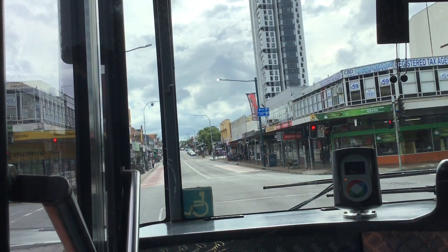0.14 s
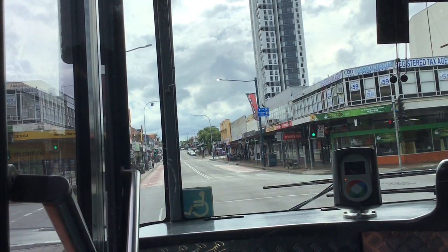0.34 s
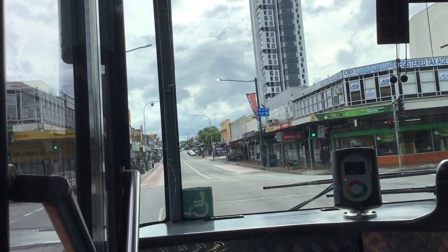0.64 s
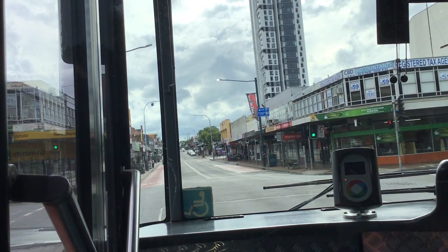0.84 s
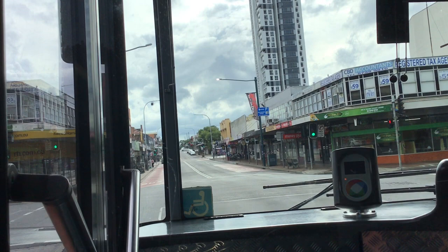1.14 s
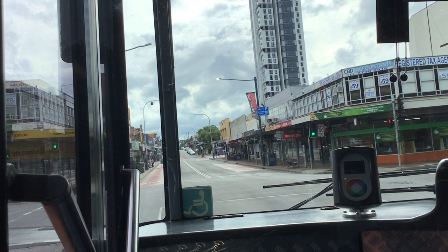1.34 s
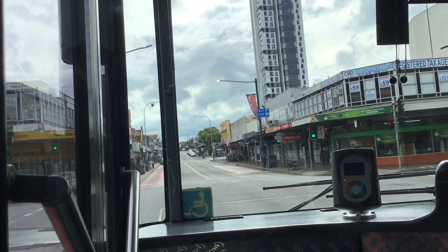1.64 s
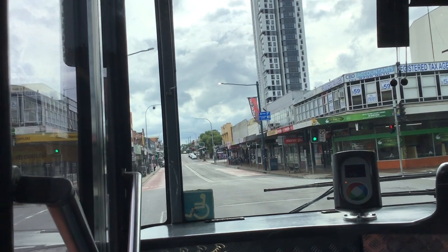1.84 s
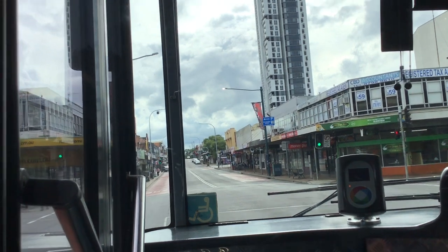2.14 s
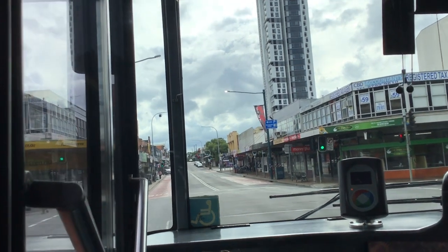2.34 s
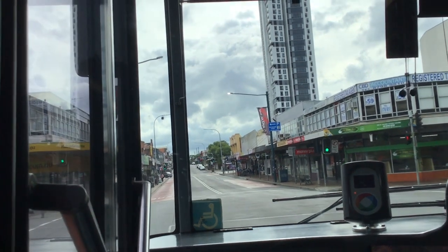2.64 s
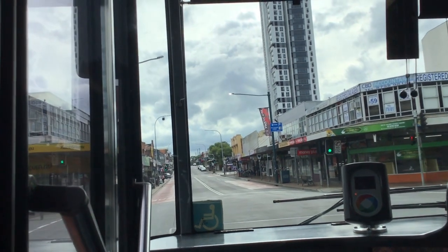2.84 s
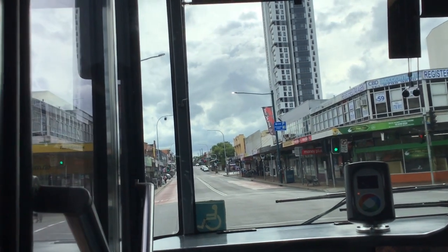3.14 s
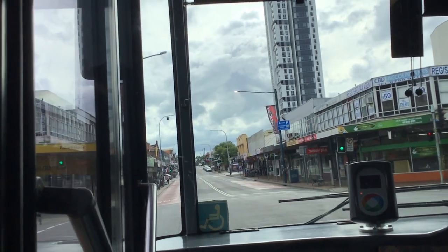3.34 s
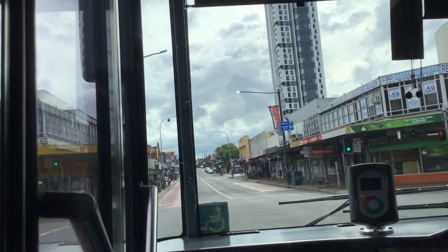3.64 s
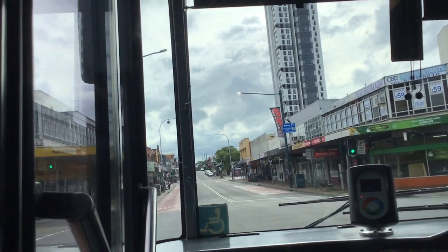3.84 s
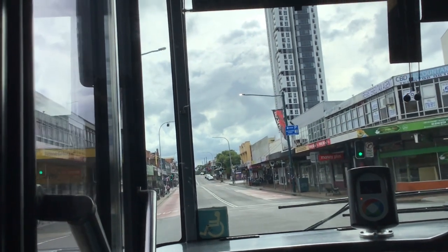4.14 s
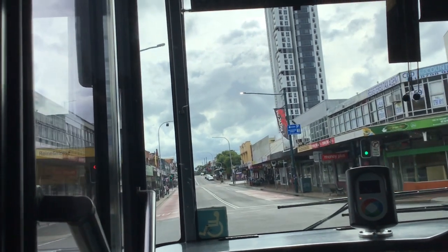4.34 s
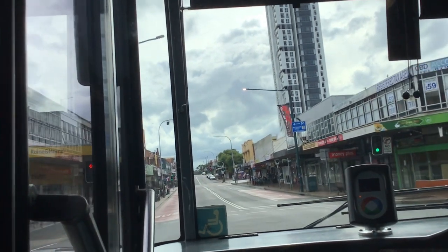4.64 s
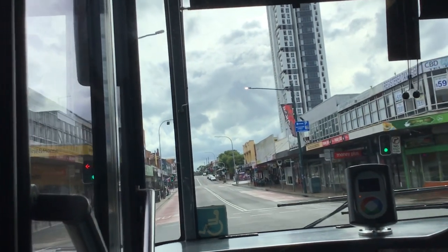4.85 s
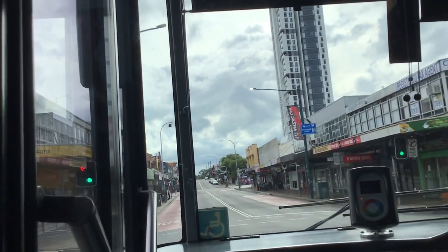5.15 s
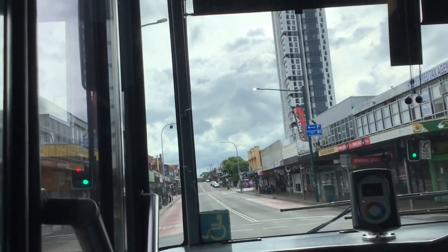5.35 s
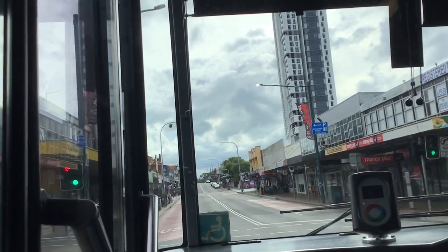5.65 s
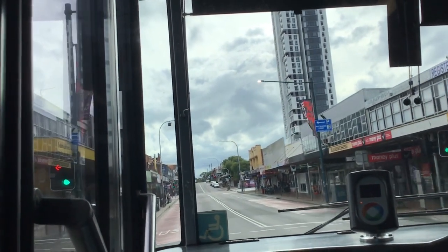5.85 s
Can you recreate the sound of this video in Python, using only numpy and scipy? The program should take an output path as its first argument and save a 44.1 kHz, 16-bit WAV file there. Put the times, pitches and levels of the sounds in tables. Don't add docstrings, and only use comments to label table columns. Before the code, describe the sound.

Inside a bus at a junction, a diesel engine idles low with soft clatter and a steady fan hum. Around one second the brake releases with a short puff of air and a metallic clack. The driveline shudders, then the engine pulls and climbs, booming deeply. Loose trim knocks sharply just after three seconds, with faint rustles nearby. Heard in mono from a microphone in the cabin.

```python
import sys
import numpy as np
from scipy import signal
from scipy.fft import rfft, irfft, next_fast_len
from scipy.io import wavfile
from scipy.ndimage import uniform_filter1d, map_coordinates

SR = 44100
rng = np.random.default_rng(int(sys.argv[2]) if len(sys.argv) > 2 else 0)


def ratio(d):
    e = np.asarray(d, float) / 20
    return 10 ** e


def master(y):
    cut = np.clip(np.atleast_2d(y).T, -1, 1)
    pcm = np.round(cut * 32767)
    wavfile.write(sys.argv[1], SR, pcm.astype(np.int16))


N = 264159

# (time [s], rate [Hz])
IDLE_SPEED = [(0.0, 30.34), (.3, 30.05), (.75, 30.15), (.92, 29.7), (1.36, 30.42)]
SHUDDER_SPEED = [(1.5, 33.23), (1.66, 34.46), (1.8, 35.5), (1.96, 33.24), (2.1, 35.4), (2.24, 33.8)]
PULL_SPEED = [(1.75, 20.08), (1.91, 22.37), (2.12, 24.32), (2.39, 26.88), (2.66, 28.35), (2.92, 29.61),
              (3.4, 31.37), (3.75, 32.14), (4.25, 32.73), (4.9, 33.54), (5.37, 34.36), (5.99, 35.76)]
# (order [multiple], level [dB])
IDLE_STRONG = [(2, -33), (3, -35.5), (6, -33.5)]
SHUDDER_STRONG = [(2, -36), (3, -39), (4, -40)]
PULL_STRONG = [(2, -20.5), (4, -20.5), (6, -26)]
# (frequency [Hz], level [dB])
IDLE_REACH = [(120, -3), (150, 1), (180, 0), (210, -14), (240, 0), (270, -18)]
SHUDDER_REACH = [(170, -6), (205, 3.5), (240, -8.5)]
PULL_REACH = [(85, 0.5), (100, 2), (140, 3.5), (175, 1.5), (200, -3), (230, -4.5), (265, -12.5), (300, -9),
              (345, -11.5), (385, -21.5), (460, -14.5), (540, -18), (600, -23), (850, -27)]
# (middle [s], length [s], order [multiple], gain [dB])
IDLE_SWELLS = [(.72, 0.19, 3, 12.5), (1.63, 0.99, 2, -14), (1.6, 0.71, 3, -10), (1.45, 0.79, 6, 4.5),
               (1.095, 0.21, 3, 6), (0.34, 0.23, 5, 5.5), (.68, 0.22, 5, 6), (0.95, .2, 6, -7),
               (1.1, 0.26, 4, 5.5), (1.83, .6, 8, -10), (1.09, .35, 5, -6), (1.3, .3, 2, -4),
               (0.49, .15, 4, 6)]
SHUDDER_JOLTS = [(1.685, 0.37, 2, 19), (1.65, 0.23, 3, 15.5), (1.658, 0.19, 4, 24), (1.635, 0.4, 6, 8),
                 (1.79, .1, 3, 18), (1.95, 0.18, 2, 12), (1.97, .25, 3, 10), (1.95, 0.18, 6, 6.5),
                 (2.1, 0.18, 4, 14.5), (1.55, .2, 7, 11)]
PULL_BOOMS = [(1.95, 0.23, 10, 12), (2.57, 0.28, 8, 12.5), (2.85, 0.25, 5, 2.5), (3.1, 0.27, 10, 6),
              (3.35, 0.68, 11, 4.5), (3.7, 0.26, 16, 9.5), (3.85, 1, 26, 10), (4.0, 0.37, 14, 0),
              (4.55, 0.4, 9, 7.5), (5.05, 0.57, 10, 4.5), (5.05, 0.94, 16, 2), (5.1, 0.56, 7, 5.5),
              (5.2, 0.48, 22, 12), (5.5, 1, 13, 5), (5.65, 0.76, 5, 6.5), (5.85, 0.57, 11, 16.5),
              (5.85, 0.57, 8, 7), (4.4, 0.45, 5, 2.5), (3.3, 0.32, 7, 5), (1.95, .45, 6, -7),
              (2.97, .45, 2, -5), (2.3, 0.25, 6, 3), (2.78, .12, 4, -8), (4.15, .2, 4, 6), (4.45, .3, 4, 4),
              (5.9, .5, 3, -4), (5.9, 0.36, 4, 2), (4.7, .2, 4, 3.5)]
# (centre [Hz], width [Hz], level [dB])
AIR_MODES = [(55.5, 5.2, -3.5), (64.08, 3.9, 1.5), (66.7, 3.63, 1.5), (69.35, 1.7, -1), (72.1, 3.43, -1),
             (93.2, 8.7, -2.5), (105.3, 5.8, 1), (111.9, 4.2, 0), (119, 4.7, 2), (125.64, 6.2, -0.5),
             (137.36, 5.64, 2), (185, 10.9, 2.5), (193.6, 5.6, -1.5), (212.3, 11.4, -3)]

# (frequency [Hz], level [dB per Hz])
RUMBLE_COLOUR = [(18, -39), (30, -31), (69, -1), (150, 2.5), (308, -9.5), (372, -21.5), (420, -37),
                 (550, -49), (920, -120)]
DRONE_COLOUR = [(190, -20), (330, 0.5), (415, -3), (522, -0.5), (758, -7), (794, -8.5), (987, -14.5),
                (1300, -42), (1690, -47), (2860, -120)]
CLATTER_IDLE_COLOUR = [(530, -17.5), (900, -15.5), (964, -7), (1390, -8.5), (1480, -12.5), (1870, -12),
                       (2770, -16.5), (3120, -16.5), (3400, -16.5), (3840, -20.5), (7000, -33.5),
                       (9100, -64), (15400, -120)]
CLATTER_LOAD_COLOUR = [(530, -31), (900, -2.5), (989, -0.5), (1340, -5.5), (1700, -5.5), (2030, -2),
                       (2840, -8.5), (3180, -10.5), (3290, -12), (3940, -12), (4600, -15), (5500, -13),
                       (7000, -32.5), (9100, -47), (15400, -120)]
PUFF_COLOUR = [(180, -28), (300, 1.5), (424, -7.5), (544, -0.5), (795, -14.5), (908, -11.5), (1700, -17.5),
               (1970, -12), (3130, -24), (4510, -19), (7160, -41), (8730, -41), (15600, -58)]
HISS_COLOUR = [(3410, -17.5), (5800, -7.5), (6980, -7), (10400, -10.5), (15600, -17.5)]
RUSTLE_COLOUR = [(5500, -30), (7000, -0.5), (9500, -2), (12000, -9), (14500, -5), (16000, -13)]
# (middle [s], length [s], gain [dB])
SMOOTH_ROAD = [(1.35, 0.23, -0.5), (2.08, .4, -1.5), (2.85, 0.47, -2), (3.47, 0.43, -7), (4.9, 0.31, -2)]

# (centre [Hz], width [Hz], level [dB])
BLOCK_MODES = [(1990, 210, 0), (2686, 75, -3), (3105, 47, -3.5), (3458, 48, -2.5), (4170, 84, -7.5),
               (5280, 90, -12), (5460, 60, -12), (10900, 960, -29.5)]
TRIM_MODES = [(1120, 310, -1), (1610, 450, 1.5)]
SNAP_MODES = [(2040, 860, -5), (3150, 510, 0)]
THUD_MODES = [(480, 113, -3), (677, 260, -7.5), (976, 230, -10.5)]

# (start [s], peak [dB], held [s], time to fade 60 dB [s], extra fizz [dB])
PUFFS = [(.659, -38, .015, .15, -15), (.996, -36.5, 0.016, 0.2, -20), (1.05, -21, 0.019, 0.35, -20),
         (1.942, -29.5, 0.014, 0.2, -15), (.93, -38, 0.054, 0.17, -22.5), (2.049, -41, .015, .12, -6),
         (3.169, -38, .005, 0.065, -5.5), (3.22, -26.5, 0.005, 0.12, -16),
         (3.225, -30, 0.0055, 0.055, -14.5), (1.054, -33, 0.007, 0.055, -7), (4.708, -29, 0.016, .1, -17.5)]
# (time [s], level [dB])
CLACKS = [
    (1.051, -28.5),
    (1.069, -32),
]
# (frequency [Hz], level [dB], time to fade 60 dB [s])
VALVE_TONES = [(1320, -6, 0.046), (2000, -18, .04), (4400, 2.5, 0.028), (5170, -5, .025)]
# (time [s], peak [dB], time to fade 60 dB [s], thud [dB])
KNOCKS = [(1.069, -22.5, 0.086, 2), (1.089, -32.5, 0.07, 4), (1.943, -27, 0.092, -3),
          (3.225, -15, 0.095, -5), (3.267, -29, 0.077, 0), (3.321, -22.5, 0.11, 2), (3.411, -23, 0.069, -3),
          (3.62, -35.5, 0.084, 6), (4.089, -28, 0.082, 1), (5.273, -36, 0.083, -3), (5.923, -29, 0.071, -4)]
# (middle [s], length [s], level [dB])
RUSTLES = [(1.565, .2, -65.5), (1.797, .08, -65), (2.937, 0.13, -58), (3.812, .16, -58.5), (4.13, .14, -64),
           (4.93, .07, -70)]
# (start [s], length [s], level [dB])
SQUEAKS = [
    (3.569, 0.05, -74),
    (4.172, 0.062, -64),
]
# (frequency [Hz], level [dB])
FAN_TONES = [(298, -39), (571, -53), (597, -50.5), (3451, -71.5), (7424, -80)]


def unit(x):
    return x / np.sqrt(np.mean(x ** 2) + 1e-20)


def along(points, hz):
    f, v = np.transpose(points)
    return np.interp(np.log(hz + 1), np.log(f + 1), v)


def speed(rows):
    s, hz = np.transpose(rows)
    return np.interp(np.arange(N) / SR, s, hz)


def wobble(rate):
    knots = rng.standard_normal(int(N * rate / SR) + 4)
    return map_coordinates(knots, [np.arange(N) * rate / SR])


def between(start, stop, ease):
    t = np.arange(N) / SR
    return np.clip(np.minimum(t - start, stop - t) / ease, 0, 1)


def swell(rows):
    return sum(db * between(s - length / 2, s + length / 2, length / 3) for s, length, db in rows)


def effort(idle_db, full_db):
    since = np.clip(np.arange(N) / SR - 1.417, 0, None)
    return full_db + (idle_db - full_db) * np.exp(-since / 0.23)


def filtered(x, response):
    m = next_fast_len(N + SR // 2)
    return irfft(rfft(x, m) * response(np.fft.rfftfreq(m, 1 / SR)), m)[..., :N]


def resonant(x, modes):
    def response(f):
        total = 0
        for k, (centre, width, db) in enumerate(modes):
            peak = 1j * f * width / (centre * centre - f * f + 1j * f * width)
            total = total + (-1) ** k * ratio(db) * peak
        return total

    power = np.mean(np.abs(response(np.linspace(1, SR / 2, num=4000))) ** 2)
    return filtered(x, response) / np.sqrt(power)


def rush(colour, patchy_db, gate=1):
    z = signal.stft(rng.standard_normal(N), nperseg=512)[2]
    field = uniform_filter1d(rng.standard_normal(z.shape), size=5, axis=0)
    field = uniform_filter1d(field, size=10, axis=1)
    patched = signal.istft(z * ratio(patchy_db * unit(field)), nperseg=512)[1][:N]
    return unit(filtered(patched * gate, lambda hz: ratio(along(colour, hz))))


def air_gain_db(hz, modes):
    power = sum(ratio(2 * db) / (1 + (2 * (hz - centre) / width) ** 2) ** 2 for centre, width, db in modes)
    return 10 * np.log10(power)


def orders(rows, strong, rest_db, reach, count, waver_db, drift, booms, modes=None):
    firing_hz = speed(rows)
    turn = 2 * np.pi * np.cumsum(firing_hz) / SR
    strong_db = {round(k): db for k, db in strong}
    total = np.zeros(N)
    for k in range(2, count):
        boom_db = swell([(s, length, db) for s, length, order, db in booms if round(order) == k])
        waver = waver_db * wobble(5)
        if k not in strong_db:
            level_db = boom_db + waver + rest_db + along(reach, k * firing_hz)
        elif modes:
            level_db = boom_db + 0.4 * waver + strong_db[k] + air_gain_db(k * firing_hz, modes)
        else:
            level_db = boom_db + waver + strong_db[k]
        phase = rng.uniform(0, 2 * np.pi) + drift * wobble(8)
        total += np.sqrt(2) * ratio(level_db) * np.sin(k * turn + phase)
    return total


def pulling():
    rest_db = -32.5 - 7 * between(1.85, 2.55, ease=0.17)
    lines = orders(PULL_SPEED, PULL_STRONG, rest_db, PULL_REACH, count=28, waver_db=2.2, drift=.1,
                   booms=PULL_BOOMS, modes=AIR_MODES)
    return between(1.76, 7, ease=0.17) * lines


def idling():
    lines = orders(IDLE_SPEED, IDLE_STRONG, -33, IDLE_REACH, count=10, waver_db=1.5, drift=.08,
                   booms=IDLE_SWELLS)
    return between(-1, 1.99, ease=0.18) * lines


def shudder():
    lines = orders(SHUDDER_SPEED, SHUDDER_STRONG, -38.5, SHUDDER_REACH, count=8, waver_db=1, drift=.15,
                   booms=SHUDDER_JOLTS)
    return between(1.5, 2.24, ease=0.055) * lines


def firing_throb():
    firing_hz = np.where(np.arange(N) < 2 * SR, speed(IDLE_SPEED), speed(PULL_SPEED))
    return 1 + 0.056 * np.cos(4 * np.pi * np.cumsum(firing_hz) / SR + 0.38 * wobble(28))


def clatter(throb):
    load = np.clip((np.arange(N) / SR - 1.44) / 0.031, 0, 1)
    surge_db = 1.9 * between(1.46, 1.5, ease=0.033)
    level_db = effort(-50.5, -42.5) + surge_db
    idle = rush(CLATTER_IDLE_COLOUR, patchy_db=1.0, gate=throb)
    loaded = rush(CLATTER_LOAD_COLOUR, patchy_db=1.1, gate=throb)
    blend = np.sqrt(1 - load) * idle + np.sqrt(load) * loaded
    ringing = resonant(throb * rng.standard_normal(N), BLOCK_MODES)
    return ratio(level_db + 1.0 + 0.18 * wobble(14)) * blend + ratio(level_db - 8.0) * ringing


def body():
    throb, shake = firing_throb(), wobble(7.5)
    rumble_db = effort(-24, -21) + swell(SMOOTH_ROAD) - 4.0 + 0.61 * shake
    drone_db = effort(-38.5, -35.5) - 1.0 + 0.26 * shake
    rumble = ratio(rumble_db) * rush(RUMBLE_COLOUR, patchy_db=0.5)
    drone = ratio(drone_db) * rush(DRONE_COLOUR, patchy_db=0.7, gate=throb)
    return rumble + drone + clatter(throb)


def puffs():
    t = np.arange(N) / SR
    jets, fizz = np.zeros(N), np.zeros(N)
    for s, db, held, t60, fizz_db in PUFFS:
        jet = (t > s) * ratio(db - 7.5 - 60 * np.clip(t - s - held, 0, 1) / t60)
        jets += jet
        fizz += jet * ratio(fizz_db)
    sputter = ratio(0.92 * wobble(120))
    return sputter * (jets * rush(PUFF_COLOUR, patchy_db=2.5) + fizz * rush(HISS_COLOUR, patchy_db=4.0))


def valve():
    out, t = np.zeros(N), np.arange(SR // 8) / SR
    for s, db in CLACKS:
        ring = np.zeros(len(t))
        for hz, level, t60 in VALVE_TONES:
            ring += ratio(level + rng.normal(0, 2) - 60 * t / t60) * np.sin(2 * np.pi * hz * t)
        out[round(s * SR):][:len(t)] += ratio(db) * ring * np.clip(t / .002, 0, 1)
    return out


def knocks():
    t = np.arange(N) / SR
    blows, snaps, thuds = np.zeros(N), np.zeros(N), np.zeros(N)
    for s, db, t60, thud_db in KNOCKS:
        fade_db = -60 * np.clip(t - s, 0, 1) / t60
        blow = between(s - .001, s + 1, ease=0.003) * ratio(db - 11.0 + fade_db)
        blows += blow
        snaps += blow * ratio(db + 16.0)
        thuds += np.sqrt(blow) * ratio(db / 2 + thud_db - 3.0) * between(0, s + .15, ease=.1)
    rattle = np.zeros(N)
    for drive, modes in [(blows, TRIM_MODES), (snaps, SNAP_MODES), (thuds, THUD_MODES)]:
        rattle += resonant(drive * rng.standard_normal(N), modes)
    return filtered(rattle, lambda hz: 1 / (1 + 1j * hz / 4500) ** 2)


def whine():
    t = np.arange(N) / SR
    level = ratio(-56.5 + 1.3 * wobble(6.5)) * between(3.2, 4.6, ease=0.17)
    return level * np.sin(2 * np.pi * 3115 * t + 1.003 * wobble(25))


def rustle():
    t = np.arange(N) / SR
    swells = sum(ratio(db) * between(s - length / 2, s + length / 2, ease=.03) for s, length, db in RUSTLES)
    held = sum(ratio(db) * between(s, s + length, ease=.012) for s, length, db in SQUEAKS)
    hiss = ratio(effort(-71, -61.5) + 2.0 + .5 * wobble(16)) * rush(HISS_COLOUR, patchy_db=1.0)
    crackle = rush(RUSTLE_COLOUR, patchy_db=1.2, gate=ratio(1.2 * wobble(150)))
    return hiss + swells * crackle + held * np.sin(2 * np.pi * 12900 * t)


def fan():
    t = np.arange(N) / SR
    tones = np.zeros(N)
    for hz, db in FAN_TONES:
        level_db = db + 2.5 * wobble(3.72) + (hz > 1000) * effort(0, -5)
        tones += np.sqrt(2) * ratio(level_db) * np.sin(2 * np.pi * hz * t + .5 * wobble(7))
    return tones * ratio(-7 * between(4.78, 7, ease=0.23))


def scene():
    engine = pulling() + idling() + shudder() + body() + whine()
    return (engine + puffs() + valve() + knocks() + rustle() + fan())[None]


def band_limit(x):
    return signal.sosfilt(signal.butter(12, 15710, fs=SR, output="sos"), x)


def record(dry):
    return band_limit(dry)


dry = scene()
out = record(dry)
master(out)
```